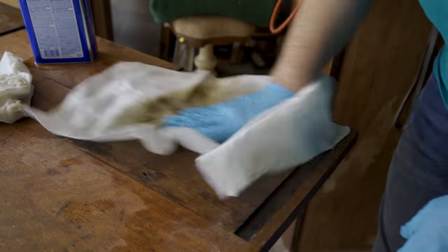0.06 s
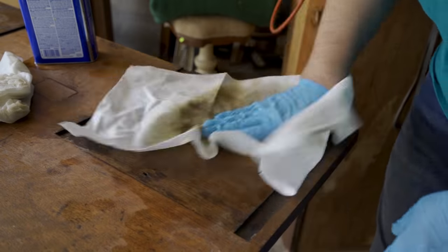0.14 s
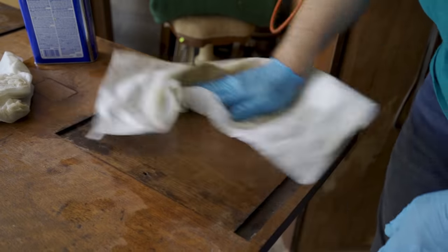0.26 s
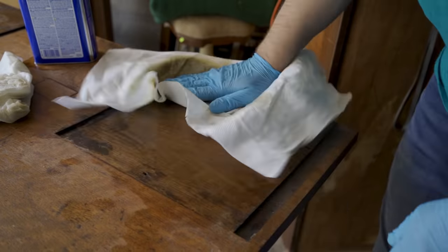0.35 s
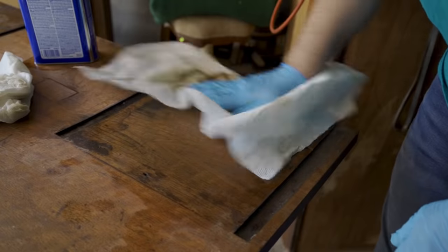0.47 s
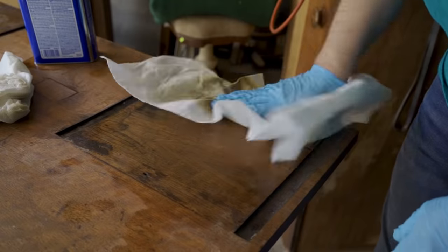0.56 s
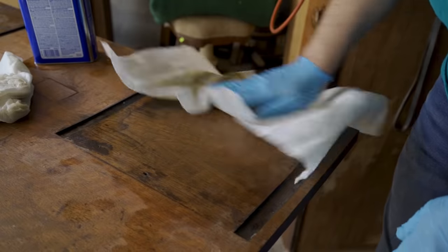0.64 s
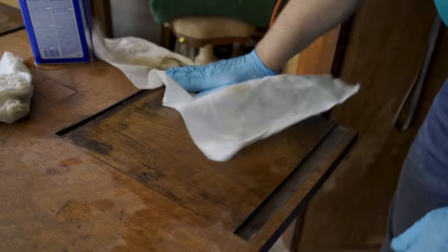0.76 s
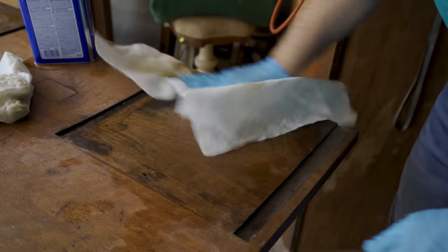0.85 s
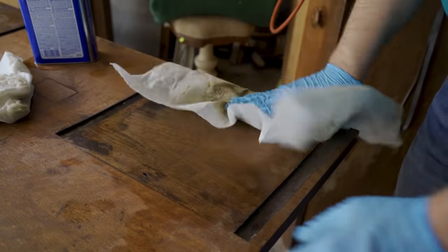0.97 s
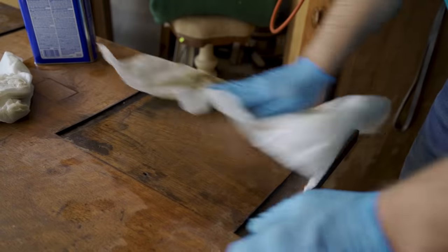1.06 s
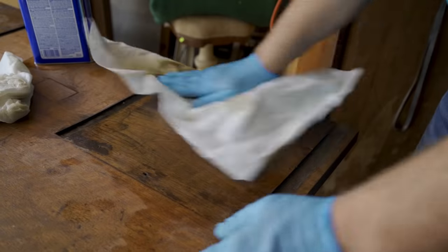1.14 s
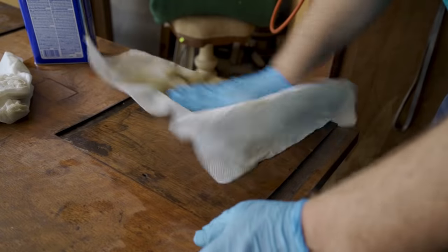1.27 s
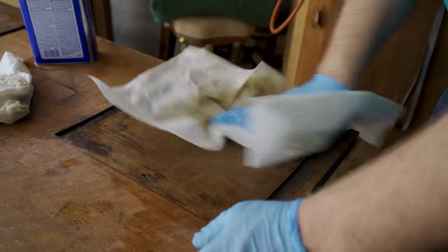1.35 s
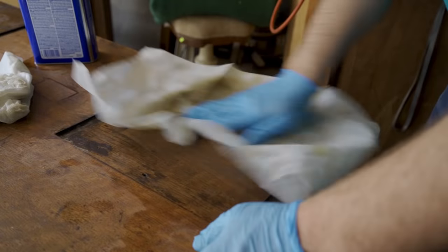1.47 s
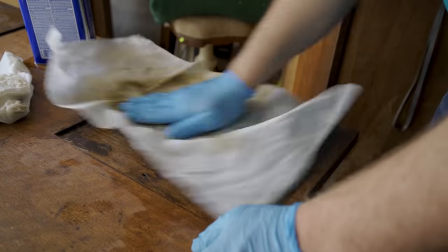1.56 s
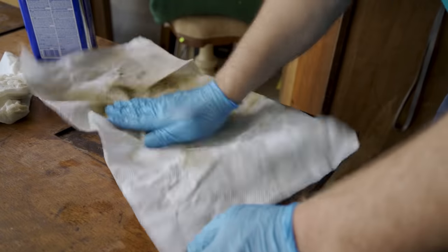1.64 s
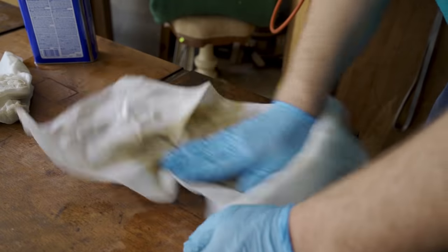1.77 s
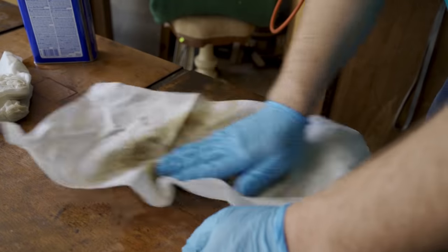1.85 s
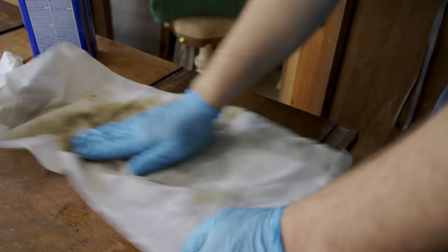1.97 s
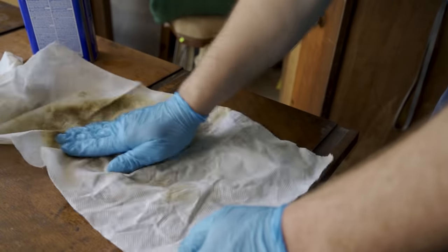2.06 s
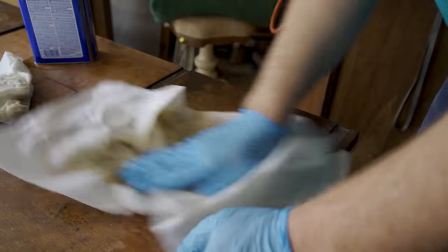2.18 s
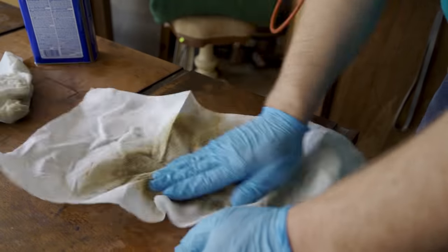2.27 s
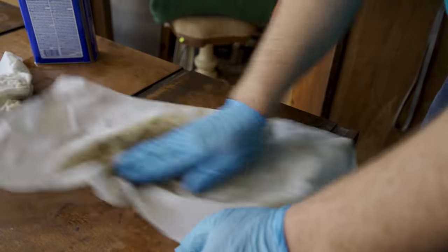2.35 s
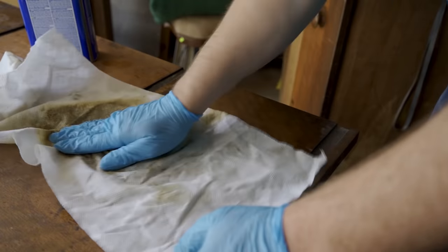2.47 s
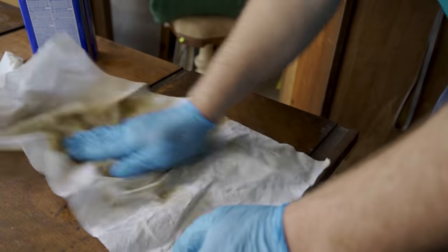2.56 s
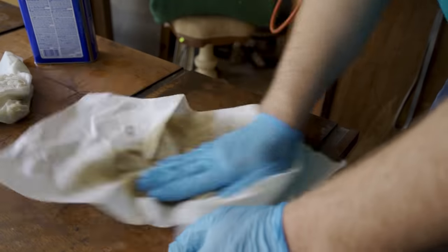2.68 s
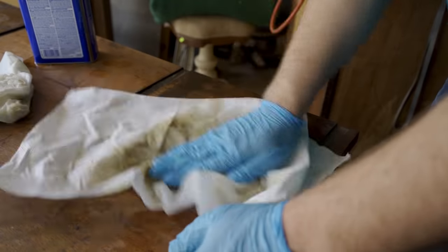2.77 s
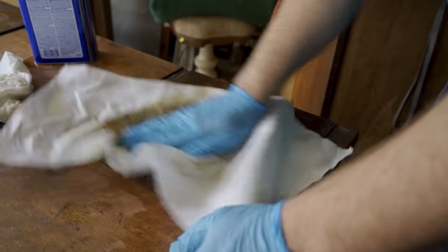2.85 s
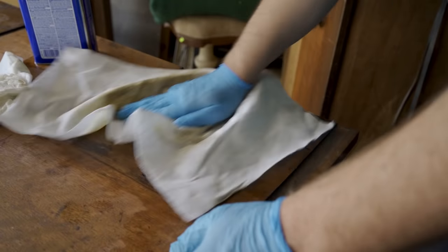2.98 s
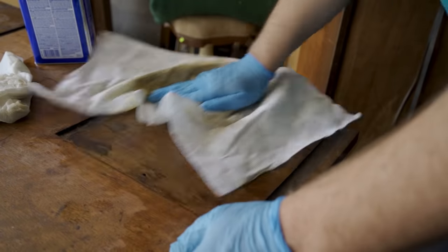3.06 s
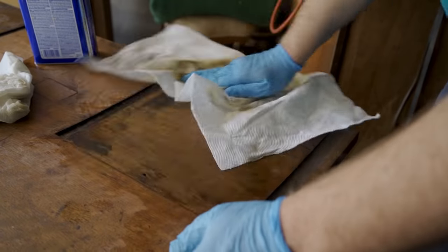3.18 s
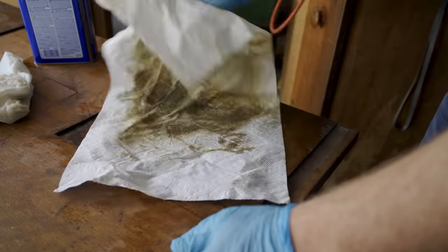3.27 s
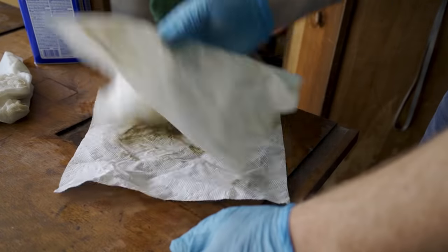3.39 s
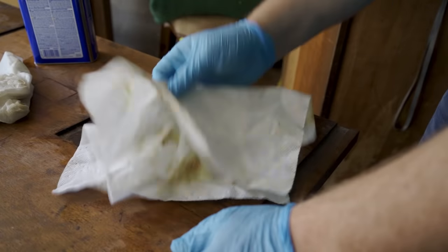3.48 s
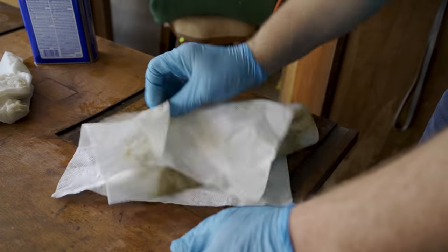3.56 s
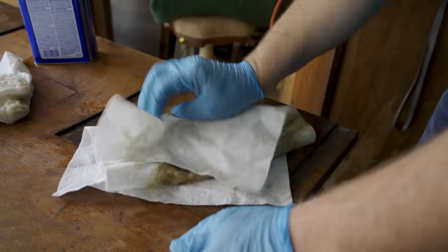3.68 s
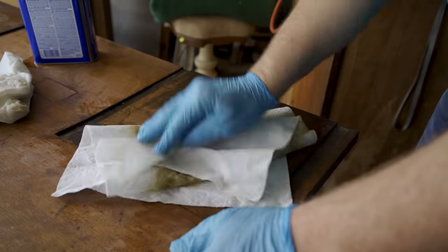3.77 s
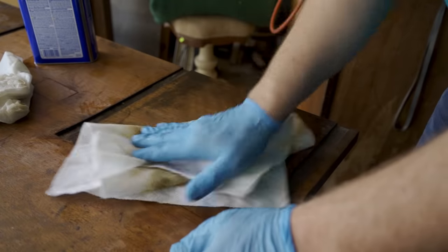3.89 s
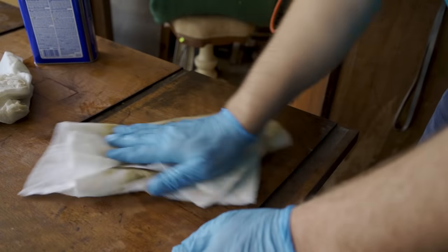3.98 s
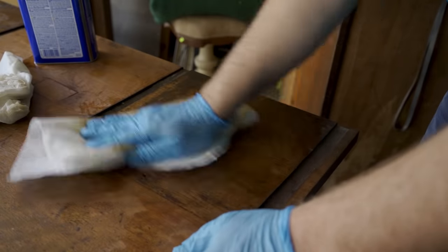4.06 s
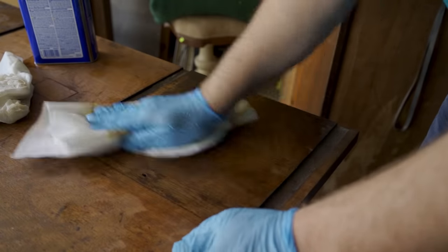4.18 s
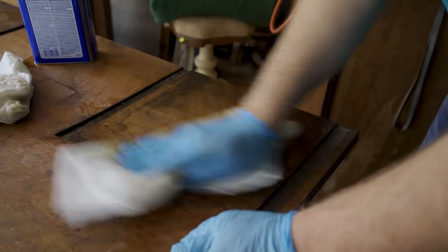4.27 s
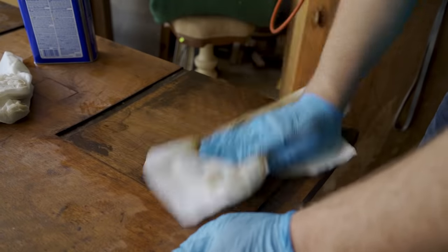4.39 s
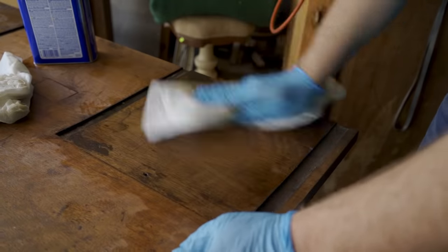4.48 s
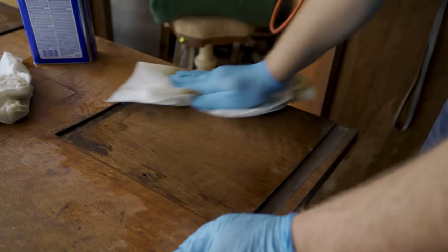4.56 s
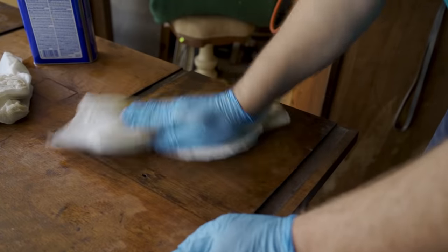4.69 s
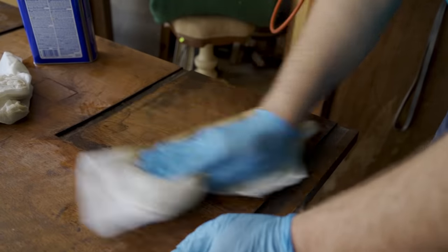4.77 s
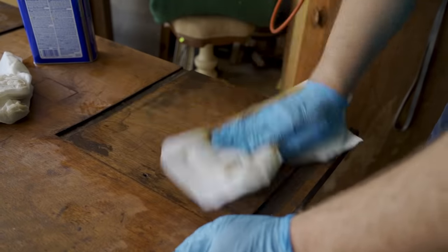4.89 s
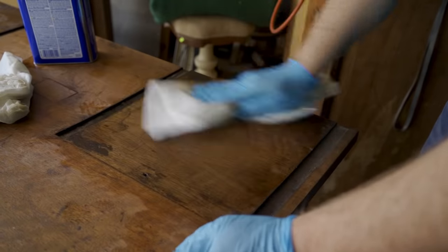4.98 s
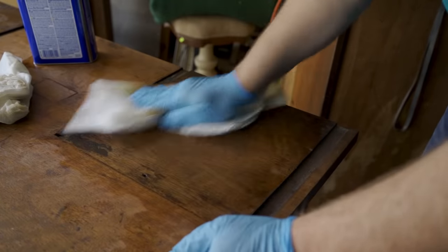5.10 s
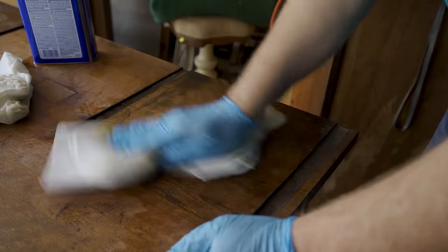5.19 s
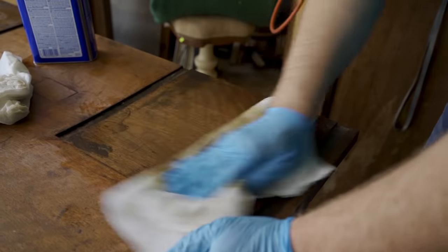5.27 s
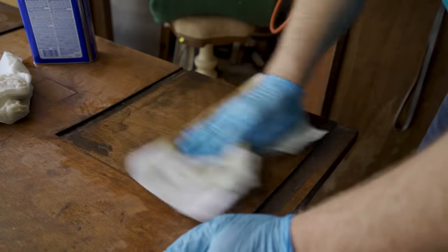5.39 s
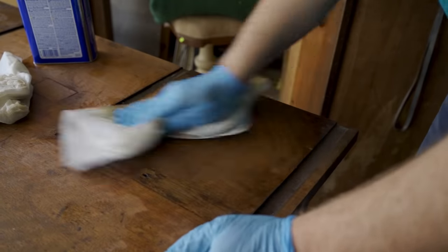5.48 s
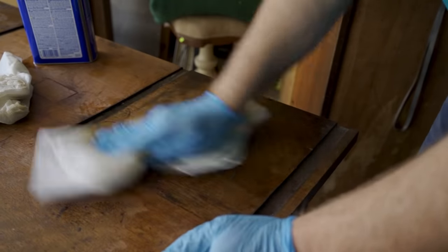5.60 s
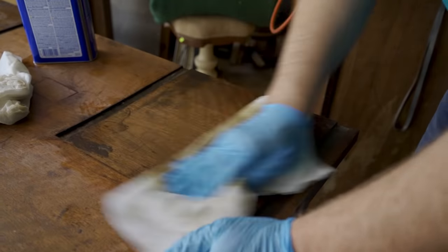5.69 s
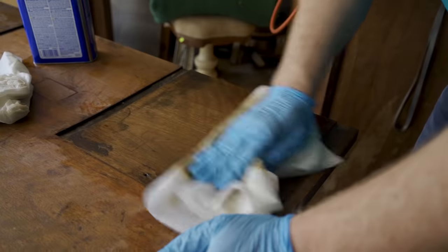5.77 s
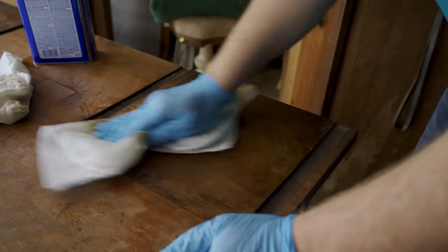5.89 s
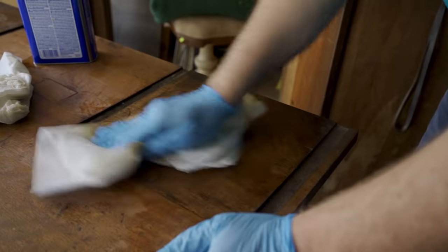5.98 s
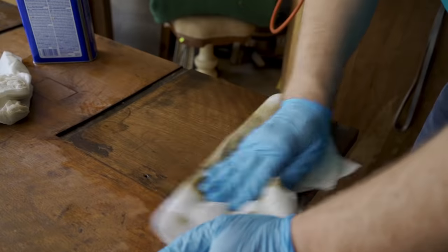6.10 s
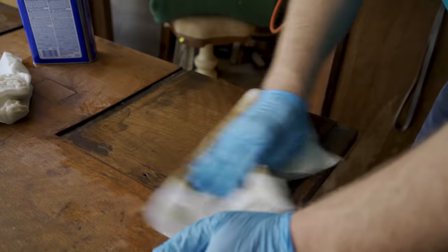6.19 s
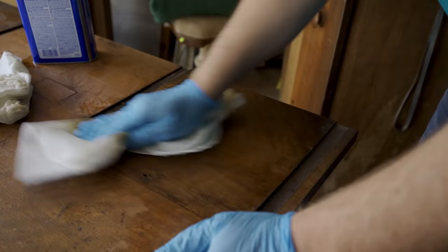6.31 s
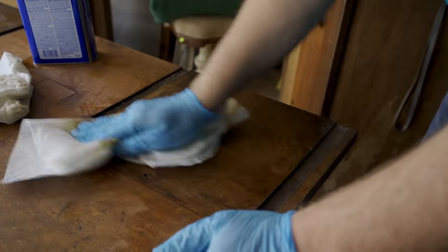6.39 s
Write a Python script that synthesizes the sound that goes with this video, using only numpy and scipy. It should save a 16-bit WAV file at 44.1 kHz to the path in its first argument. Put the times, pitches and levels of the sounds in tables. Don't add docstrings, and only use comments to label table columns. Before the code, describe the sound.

Rhythmic damp swishes on a wooden table, its loose leaf thudding gently at stroke ends, then faint crease snaps and faster, choppier rubbing with a folded pad.

```python
import sys
import numpy as np
from scipy import signal
from scipy.fft import rfft, irfft, next_fast_len
from scipy.io import wavfile
from scipy.ndimage import uniform_filter1d, map_coordinates

SR = 44100
rng = np.random.default_rng(int(sys.argv[2]) if len(sys.argv) > 2 else 0)


def store_pcm(level_fs):
    pcm = np.round(np.clip(level_fs, -1, 1) * 32767).astype(np.int16)
    wavfile.write(sys.argv[1], SR, np.atleast_2d(pcm).T)


def boost(x):
    u = np.asarray(x, float) / 20
    return 10 ** u


N = 284031
SECONDS = np.arange(N) / SR

# t/s, peak level/dB, low modes re all/dB, left-right/dB
KNOCKS = [(0.105, -59, -23, 8), (0.318, -52.5, -7.5, 1.0), (0.482, -44.5, -15, 0), (0.562, -50, -7, 1),
          (0.745, -38, -19, 0.5), (0.907, -38.5, -19.5, -0.5), (1.007, -46.5, -12.5, -1.5),
          (1.151, -37.5, -13, 1.5), (1.316, -38, -20, 0.5), (1.412, -63, 2, -1), (1.482, -51, -16, 2),
          (1.561, -42, -9.5, 1), (1.827, -49, -9, 1), (1.957, -51, -7, 0), (2.039, -62, 1, -1),
          (2.245, -33, -16.5, 0.5), (2.479, -48.5, -9.5, -1), (2.7, -39.5, -14.5, 0), (4.283, -60.5, -1, 1),
          (4.702, -65.5, -1, 0.0), (5.797, -48.5, -18, 3.0), (5.919, -62, -1, 1), (5.986, -54, -18, 3.0),
          (6.054, -44.5, -10.5, 0), (6.144, -42, -12, 0), (6.316, -41.5, -14, 0.5), (6.382, -44, -13, 0)]


def unit(x):
    return x / np.sqrt(np.mean(x ** 2) + 1e-20)


def along(points, hz):
    f, v = np.transpose(points)
    return np.interp(np.log(hz + 1), np.log(f + 1), v)


def wobble(rate):
    knots = rng.standard_normal(int(N * rate / SR) + 4)
    return map_coordinates(knots, [SECONDS * rate])


def filtered(x, response):
    m = next_fast_len(N + 8192, True)
    return irfft(rfft(x, m) * response(np.fft.rfftfreq(m, 1 / SR)), m)[..., :N]


def sides(pan_db):
    return boost(np.array([pan_db / 2, -pan_db / 2]))


def spells(rows, rest_db, fade_s):
    gain = boost(rest_db)
    for start_s, end_s, db in rows:
        inside_s = np.minimum(SECONDS - start_s, end_s - SECONDS)
        gain = gain + boost(db) * np.clip(inside_s / fade_s + .5, 0, 1)
    return gain


def ports(hz):
    # f/Hz, phase/rad
    lead_rad = [(0, -1.5), (2500, 0.3), (3530, 0.24), (4910, 0.49), (6030, 0.39), (7580, 1.7),
                (11200, 1.75), (15600, -1.1)]
    # f/Hz, left-right/dB
    lean_db = [(60, 5), (130, 4), (290, -2.5), (640, 4.5), (1410, 0.5), (3100, 0.5), (6820, -2), (15000, 3)]
    apart = hz ** 2 / (hz ** 2 + 450 ** 2)
    half = boost(apart * along(lean_db, hz) / 2) * np.exp(.5j * apart * along(lead_rad, hz))
    return np.array([half, 1 / half])


def slips(spectrum, scatter_db, patchy_db):
    # f/Hz, correlation/1
    alike = [(60, 1.0), (130, 0.99), (290, 0.99), (640, 0.74), (1410, 0.81), (3100, 0.42), (6820, 0.39),
             (15000, 0.033)]
    size = boost(scatter_db * np.clip(rng.standard_normal(N), -2, 2))
    z = signal.stft(size * rng.standard_normal((2, N)), nperseg=512)[2]
    field = uniform_filter1d(rng.standard_normal(z.shape[1:]), 7, 0)
    field = uniform_filter1d(field, 10, 1)
    shared, own = z * boost(patchy_db * unit(field))
    hz = np.fft.rfftfreq(512, 1 / SR)[:, None]
    turn = np.arccos(np.clip(along(alike, hz), -1, 1)) / 2
    mid, side = np.cos(turn) * shared, np.sin(turn) * own
    pair = signal.istft(np.array([mid + side, mid - side]) * ports(hz), nperseg=512)[1][:, :N]
    return unit(filtered(pair, lambda f: boost(along(spectrum, f))))


def shop():
    # f/Hz, density/dB per Hz
    air_spectrum = [(15, -60), (25, -29), (107, -11), (160, -10.5), (350, -9.5), (800, -6.5), (1500, -3),
                    (1750, -9.5), (4000, -23.5), (8000, -36), (15700, -18)]
    # start t/s, end t/s, level/dB
    hum_spells = [
        (.93, 1.1, -86),
        (1.28, 1.75, -83),
        (2.35, 3.37, -80.5),
        (3.66, 4.3, -84.5),
        (4.9, 5.42, -80),
        (5.46, 5.88, -85),
        (6.2, 6.5, -94),
    ]
    phase = 2 * np.pi * 99.9 * SECONDS + 0.55 * wobble(7.1)
    hum = boost(2.1 * wobble(9)) * spells(hum_spells, rest_db=-92, fade_s=.08) * np.sin(phase)
    drift_db = .8 * wobble(2.81)
    return boost(-65.5 + drift_db) * slips(air_spectrum, scatter_db=-1.5, patchy_db=2.0) + hum


def whir():
    # f/Hz, width/Hz, level/dB
    resonances = [(1037, 115, -3.5), (1140, 82, 0), (1545, 116, -3)]
    # start t/s, end t/s, level/dB
    swells = [
        (.8, 1.5, -74),
        (1.9, 2.35, -64),
        (2.38, 2.8, -57.5),
        (2.85, 3.2, -64),
        (4.0, 4.35, -67),
        (4.85, 5.3, -76),
        (5.6, 5.76, -61),
        (5.9, 6.3, -65),
    ]
    out = 0
    for centre_hz, width_hz, db in resonances:
        def band(f):
            return (1j * f * width_hz / (centre_hz ** 2 - f * f + 1j * f * width_hz)) ** 2
        air = rng.standard_normal(N) + 0.47 * rng.standard_normal((2, N))
        swell_db = 1.6 * wobble(7)
        out = out + boost(db + swell_db) * unit(filtered(air, band))
    return boost(-3.0) * spells(swells, rest_db=-72.5, fade_s=0.12) * out


def room(x):
    # f/Hz, t60/s
    decay = [(200, 0.058), (2000, 0.41), (10000, 0.2)]
    hz, t, z = signal.stft(rng.standard_normal((2, SR // 2)), SR, nperseg=256)
    dying = boost(-60 * t / along(decay, hz)[:, None])
    tail = signal.istft(z * dying, SR, nperseg=256)[1]
    late = np.pad(x.mean(0), (300, 0))[None]
    return signal.fftconvolve(late, tail / np.linalg.norm(tail[0]), axes=1)[:, :N]


def tremble():
    # f/Hz, density/dB per Hz
    rumble_spectrum = [(65, -58), (110, -13), (322, -6.5), (370, -1.5), (430, -1), (570, -4.5), (900, -4),
                       (1170, -51), (1980, -120)]
    t60_s = 1.9
    after = 0
    for s, db, *_ in KNOCKS:
        after = after + (SECONDS > s) * boost(db - 60 * np.abs(SECONDS - s) / t60_s)
    shake = boost(-78) + boost(-28 + scrub()[0]) + boost(-30.5) * after
    return shake * boost(0.9 * wobble(23)) * slips(rumble_spectrum, scatter_db=1.0, patchy_db=3.0)


def snaps():
    # t/s, peak level/dB, f/Hz, t60/s
    creases = [
        (3.4814, -63, 5000, .04),
        (3.5573, -49, 1500, .06),
        (3.5977, -44, 1110, 0.07),
        (3.6744, -52, 1730, 0.068),
        (3.855, -49, 6170, 0.089),
        (3.934, -51, 1140, .05),
        (4.0928, -40, 1190, 0.088),
        (4.12, -43, 1120, 0.047),
    ]
    out, t = np.zeros((2, N + SR)), np.arange(SR // 5) / SR
    for s, db, hz, t60 in creases:
        band = signal.butter(2, [hz / 1.4, min(hz * 1.64, 15000)], "band", fs=SR)
        noise = rng.standard_normal(len(t)) + 0.89 * rng.standard_normal((2, len(t)))
        rustle = boost(-60 * t / t60) * unit(signal.lfilter(*band, noise))
        pop = 2.5 * boost(-60 * t / .015) * np.sin(2 * np.pi * hz * t)
        out[:, round(s * SR):][:, :len(t)] += boost(db - 12.0) * (rustle + pop)
    return out[:, :N]


def knocks():
    # f/Hz, level/dB, t60/s
    modes = [(191.4, -16.5, 0.27), (242, -48, 0.029), (330.2, -3.5, 0.56), (427, 0.5, 0.23), (483, 0, 0.28),
             (540, -13, 0.1), (622, -1, 0.18), (699, -1, 0.24), (774, 3, 0.25), (890, 1.5, 0.079),
             (1090, -22, 0.12), (1210, -2.5, 0.12)]
    # f/Hz, density/dB per Hz
    thump_spectrum = [(120, -71), (250, -7), (450, -3), (800, -5.5), (950, -6.5), (1400, -9), (3000, -60)]
    out, t = np.zeros((2, N + SR)), np.arange(SR // 5) / SR
    hz, level_db, t60 = np.transpose(modes)[:, :, None]
    dull = unit(filtered(rng.standard_normal(N), lambda f: boost(along(thump_spectrum, f))))
    dull = np.pad(dull, (0, SR))
    lead = np.array([[[.3]], [[-.3]]]) * (hz / 700) ** 2
    for s, db, low_db, pan_db in KNOCKS:
        luck = rng.standard_normal((3, len(modes), 1))
        gain_db = level_db + 0.45 * luck[0] + (hz < 520) * (low_db + 9)
        onset = np.clip(t - 0.00648 * hz / 800, 0, None)
        phase = (onset > 0) * (0.36 * luck[1] + lead)
        swing = np.sin(2 * np.pi * hz * (1 + 0.0047 * luck[2]) * onset + phase)
        first = boost(2.0 - 60 * onset / 0.067) + boost(-1.5)
        push = 1 - np.exp(-onset / 0.0035)
        ring = boost(gain_db - 60 * onset / t60) * push * first * swing
        at = round((s - .006) * SR)
        thump = boost(4.0 - 60 * t / 0.19) * (1 - np.exp(-t / 0.007)) * dull[at:][:len(t)]
        out[:, at:][:, :len(t)] += boost(db - 12) * (ring.sum(1) + thump) * sides(pan_db)[:, None]
    return out[:, :N]


def strokes(rows, end_s, end_db):
    turn_s, turn_db, top_s, top_db, dry_db = np.transpose(rows)
    k = np.clip(np.searchsorted(turn_s, SECONDS, "right") - 1, 0, None)
    next_s, next_db = np.append(turn_s[1:], end_s)[k], np.append(turn_db[1:], end_db)[k]
    rising = SECONDS < top_s[k]
    rise = (SECONDS - turn_s[k]) / (top_s - turn_s)[k]
    fall = (next_s - SECONDS) / (next_s - top_s[k])
    u = np.clip(np.where(rising, rise, fall), 0, 1)
    speed = np.sin(np.pi / 2 * u) ** np.where(rising, 1.11, 1.42)
    low = boost(np.where(rising, turn_db[k], next_db))
    level_db = 20 * np.log10(low + (boost(top_db[k]) - low) * speed)
    slow_db = top_db[k] - level_db
    progress = np.clip((SECONDS - turn_s[k]) / (next_s - turn_s[k]), 0, 1)
    return level_db, slow_db, np.interp(SECONDS, top_s, dry_db), speed * (progress - .5)


def scrub():
    # turn t/s, level there/dB, fastest t/s, level there/dB, dryness/dB
    spread_strokes = [(0.0, -56, 0.029, -52, 0.2), (0.232, -56, 0.346, -46.8, -2.5),
                      (0.446, -69.5, 0.59, -49.5, -1.2), (0.659, -59.9, 0.78, -48.5, -1),
                      (0.864, -63, 0.99, -46.5, -3.2), (1.06, -60.5, 1.202, -48.5, -1.5),
                      (1.27, -59.5, 1.333, -47.1, -1.5), (1.47, -61.5, 1.645, -50.5, -1.5),
                      (1.702, -55.5, 1.81, -50, -0.9), (1.89, -62, 2.054, -48.5, -0.5),
                      (2.129, -64.0, 2.243, -49, -2.8), (2.34, -64.5, 2.44, -47.5, -2),
                      (2.584, -67, 2.7, -51.5, -1), (2.82, -54.5, 3, -51.5, -4),
                      (3.038, -55, 3.1, -49.5, -3)]
    # turn t/s, level there/dB, fastest t/s, level there/dB, dryness/dB
    fold_slips = [
        (3.337, -79, 4.1, -66, -8),
        (3.47, -74, 3.486, -72.5, -4),
        (3.551, -76, 3.56, -66, 0),
        (3.596, -73, 3.62, -64.5, -7),
        (3.646, -68.5, 3.675, -69.5, -9),
        (3.755, -77, 3.82, -69, -1.5),
        (3.848, -69.5, 3.856, -62.5, 1),
        (3.885, -66, 3.91, -63.5, -3),
    ]
    # turn t/s, level there/dB, fastest t/s, level there/dB, dryness/dB
    pad_strokes = [(3.955, -68, 4.0, -58, -1), (4.06, -55.5, 4.165, -48.5, -1), (4.228, -62, 4.28, -50, 0),
                   (4.45, -51.5, 4.55, -50, 1), (4.642, -50.5, 4.695, -45.5, -4),
                   (4.77, -49, 4.74, -49.5, 0), (4.94, -52, 5.0, -51, 3.5), (5.09, -51, 5.14, -48.5, -2),
                   (5.17, -49, 5.225, -46, -1.5), (5.28, -48, 5.34, -48.5, 1),
                   (5.42, -54.5, 5.46, -53, 4.5), (5.53, -55.5, 5.574, -49.5, -1.5),
                   (5.63, -53, 5.688, -47, 0), (5.836, -56, 5.89, -51.5, 3.5),
                   (5.93, -52.5, 5.97, -49, -1.5), (6.024, -62, 6.118, -47.5, -0.5),
                   (6.235, -66, 6.285, -50, 4), (6.312, -48.5, 6.326, -45.5, 1),
                   (6.35, -50.5, 6.374, -47, 0)]
    change_s = 3.3362
    before = strokes(spread_strokes, change_s + 0.061, end_db=-62.5)
    after = strokes(list(fold_slips) + list(pad_strokes), N / SR, end_db=-59)
    return np.where(np.arange(N) < change_s * SR, before, after)


def flecks():
    per_s, mean_hz, spread_db = 260, 3600, 3.5
    when, size, tone, side = rng.random((int(per_s * N / SR), 4)).T
    at = (when * (N - 256)).astype(int)
    hz, t = mean_hz * 2 ** (2.5 * (tone[:, None] - .5)), np.arange(256) / SR
    gain = boost(scrub()[0][at] + 0.5 - spread_db * np.log(1 - .99 * size))
    grains = gain[:, None] * np.exp(-t * hz / 2.3) * np.sin(2 * np.pi * hz * t)
    where = (at[:, None] + np.arange(256)).ravel()
    ticks = []
    for g in sides(6 * (side - .5)):
        ticks.append(np.bincount(where, (grains * g[:, None]).ravel(), N))
    return filtered(np.array(ticks), lambda f: (f * f / (f * f + 1400 ** 2)) ** 2)


def rubbing():
    # f/Hz, density/dB per Hz
    body_spectrum = [(290, -56), (500, -28.5), (636, -6.5), (701, -16.5), (767, -8), (1670, 0.5),
                     (3000, -3.5), (3900, -38), (6600, -120)]
    # f/Hz, density/dB per Hz
    hiss_spectrum = [(1290, -44.5), (2200, -3.5), (3170, -2), (3500, -0.5), (5180, -3.5), (7230, -1.5),
                     (9460, -6.5), (10500, -14), (13600, -14), (22000, -120)]
    # f/Hz, density/dB per Hz
    sheen_spectrum = [(5590, -32), (9500, 0), (12000, -5.5), (14100, -3.5), (15600, -5.5)]
    # t/s, left-right/dB
    hand_place = [(0.0, -1.0), (0.16, -2.0), (1.61, -1), (2.15, 1.5), (3.3, -0.5), (3.41, 1), (4.36, 0.0),
                  (4.41, -2.5), (4.82, 0), (4.98, -3), (5.26, 1), (5.45, -2.5), (5.6, 1.5), (5.92, -1.5),
                  (5.97, 1), (6.44, -0.5)]
    hiss_db, slow_db, dry_db, late = scrub()
    body_db = -3.85 + 0.24 * slow_db - 0.26 * dry_db + 1.8 * wobble(8)
    sheen_db = -1.5 - 0.2 * slow_db + 1.1 * dry_db + 3 * late + 0.27 * wobble(20)
    stroke = boost(hiss_db + .55 * wobble(25) + .45 * wobble(90))
    hiss = boost(2.0) * slips(hiss_spectrum, scatter_db=0.5, patchy_db=0.56)
    body = boost(body_db) * slips(body_spectrum, scatter_db=1.5, patchy_db=0.5)
    sheen = boost(sheen_db) * slips(sheen_spectrum, scatter_db=2.0, patchy_db=0.5)
    pan_db = np.interp(SECONDS, *np.transpose(hand_place))
    return stroke * (hiss + body + sheen) * sides(pan_db)


def scene():
    hits = knocks() + snaps()
    background = shop() + whir() + boost(-20.5) * room(hits)
    return background + tremble() + hits + flecks() + rubbing()


def low_pass(x):
    return signal.sosfilt(signal.butter(12, 16030, fs=SR, output="sos"), x)


def record(dry):
    heard = filtered(dry, lambda hz: (hz < 15740) * hz ** 2 / (hz ** 2 + 40 ** 2))
    return low_pass(heard)


dry = scene()
out = record(dry)
store_pcm(out)
```